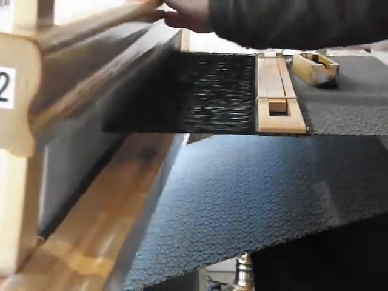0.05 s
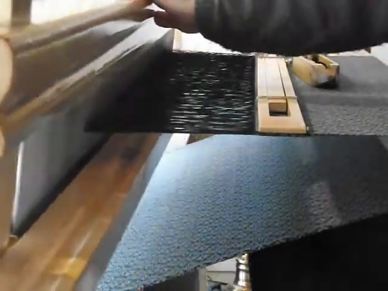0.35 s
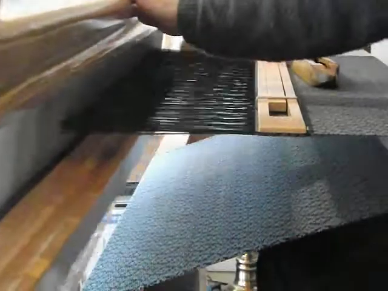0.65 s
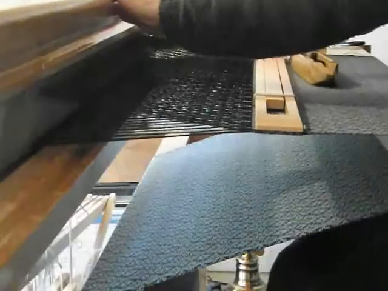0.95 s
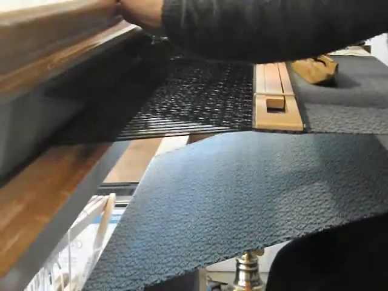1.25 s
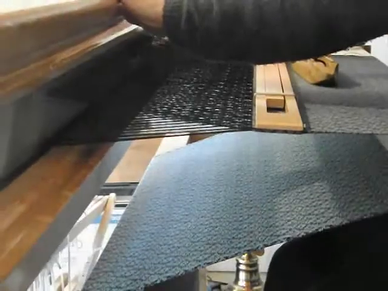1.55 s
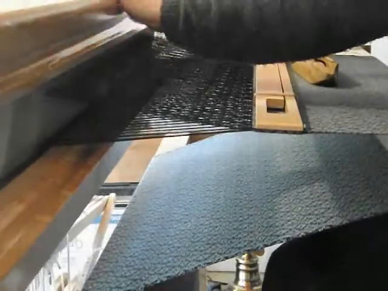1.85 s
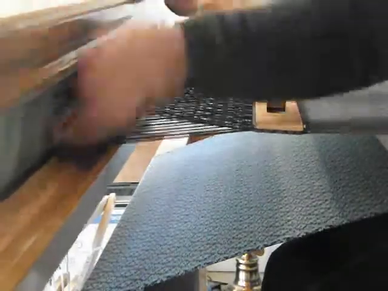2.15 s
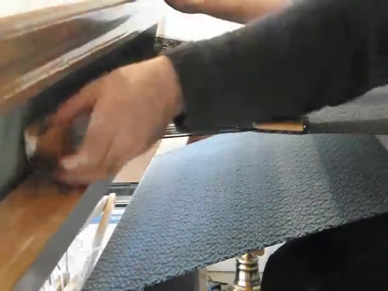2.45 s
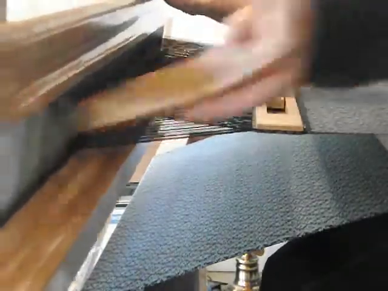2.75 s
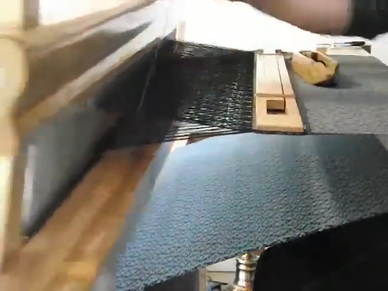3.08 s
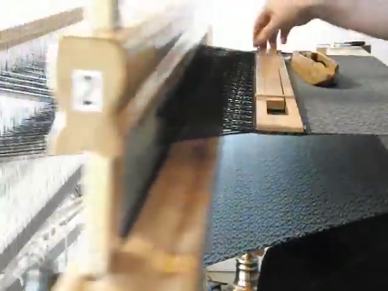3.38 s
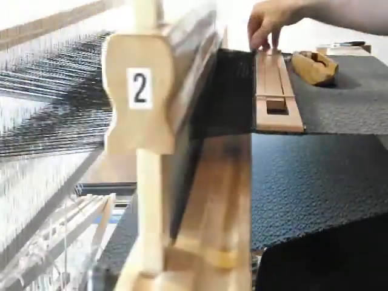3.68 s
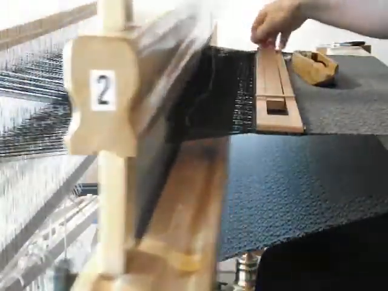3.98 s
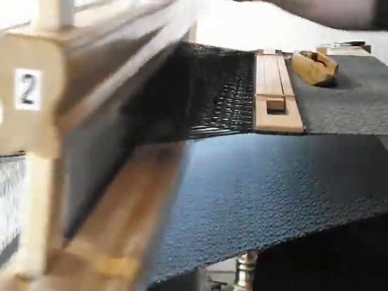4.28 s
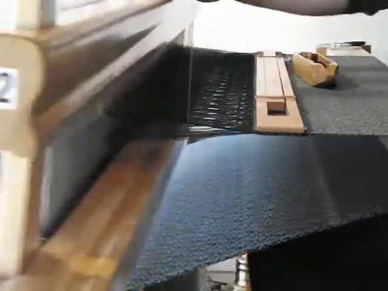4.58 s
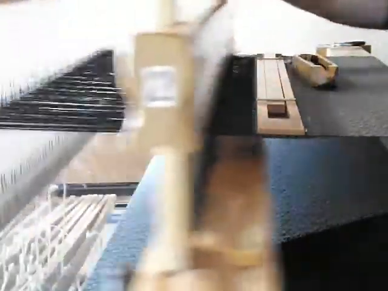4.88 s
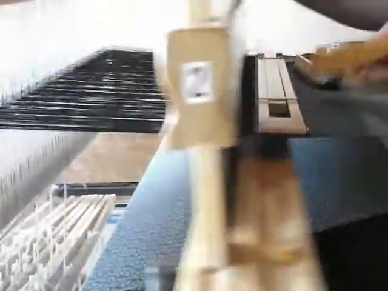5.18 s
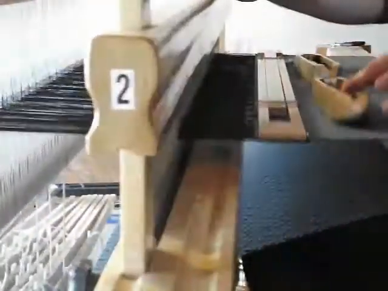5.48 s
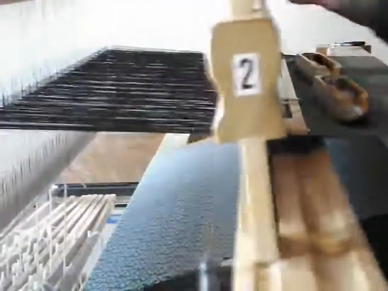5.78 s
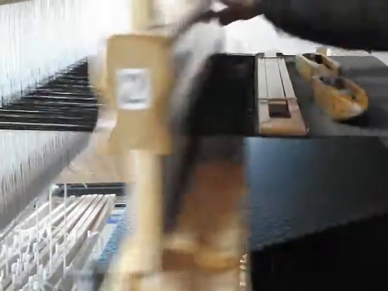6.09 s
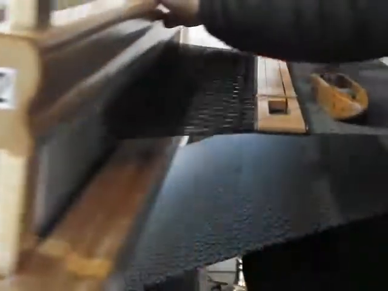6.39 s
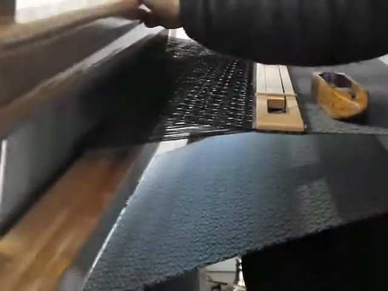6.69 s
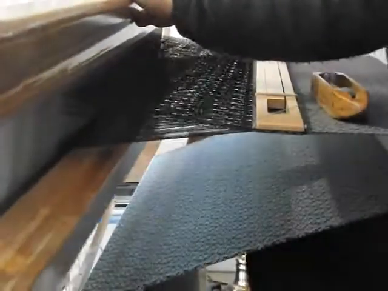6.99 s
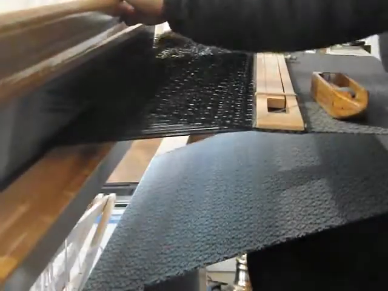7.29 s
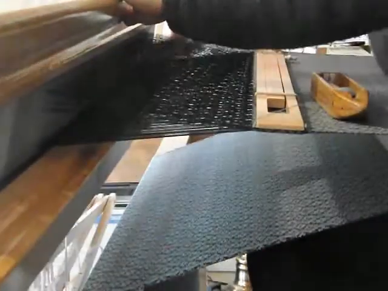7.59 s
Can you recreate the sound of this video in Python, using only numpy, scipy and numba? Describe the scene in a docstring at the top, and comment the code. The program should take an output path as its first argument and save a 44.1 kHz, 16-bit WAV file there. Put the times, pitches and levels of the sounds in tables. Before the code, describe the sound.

Metallic rattling, wooden knocks and brief pulley squeaks from a hand-worked loom, then two sharp beater blows, in a small humming room.

```python
"""A wooden floor loom, worked by hand in a small room. Treadles shift the shafts: hundreds of
wire heddles rattle and dry pulleys squeak. The shuttle slides softly, shuttle and frame knock,
metal parts clink, and the beater strikes the cloth twice; every blow rings the steel reed.
Underneath: electrical hum, room air and the low sway of a camera mount. A limiter ducks the
level after loud blows."""
import sys
import numpy as np
from scipy import signal
from scipy.fft import rfft, irfft
from scipy.io import wavfile
from scipy.ndimage import uniform_filter1d, minimum_filter1d
from numba import njit

SR = 44100
rng = np.random.default_rng(int(sys.argv[2]) if len(sys.argv) > 2 else 0)


def unload_wav(signal):
    """Save mono or channel-first audio to the path in sys.argv[1] as 16-bit WAV at rate SR, clipped to [-1, 1]."""
    wavfile.write(
        sys.argv[1],
        SR,
        np.round(np.clip(np.atleast_2d(signal).T, -1, 1) * 32767).astype(np.int16),
    )


N = 336924
TIME = np.arange(N) / SR

# wooden frame resonances: freq_hz, width_hz, gain_db
FRAME_MODES = [(256.4, 57, 1.5), (331, 22, 5.5), (525, 18, -7.5), (705, 290, -3), (814, 250, 1.5),
               (1073, 200, 3.5), (1308, 120, 5.5), (1481, 140, 10.5), (1720, 150, 9)]
# hard contact spectrum: freq_hz, gain_db
CONTACT_SPECTRUM = [(150, -13.5), (600, -30), (1500, -14.5), (2300, -2), (3100, 6.5), (3900, -3.5),
                    (4700, -9.5), (5400, -26.5), (6300, -35), (7200, -43)]


def heddles_and_slide(sag_db_per_s=44.5, settle_db_per_s=136.5, wood_ebb_ratio=0.77):
    """Heddles jostle on moving shafts and the shuttle slides; tiny contacts ring wires and frame."""
    # heddle flurries and the shuttle's soft slide (crest at 2.5 s):
    # crest_s, level_db, swell_s (per 20 dB), shaken_s, body_rel_db
    motions = [(0, -15.5, .05, 0, -6.5), (.42, -28.5, 0.2, 0.16, -3.5), (.72, -14.5, .17, 0.07, 0),
               (.865, 0, .13, 0.21, -9), (1.68, -29, 0.033, 0.016, -5.5), (1.999, -35, 0.11, 0.13, -2.5),
               (2.22, -39.5, .2, 0.12, -8.5), (2.5, -40, 0.31, 0.35, -6), (3.1, -52, 0.23, 0.00021, 8.5),
               (3.45, -47, .1, 0, -23), (4.6, -19, 0.13, 0.21, -6.5), (4.84, -16, 0.31, 0.041, -1.5),
               (5.129, -15.5, 0.36, 0.17, -5), (5.43, -26.5, 0.14, 0, 1.5), (5.84, -13, 0.095, 0.2, -7.5),
               (6.33, -16, 0.13, .08, -10), (6.521, -11, 0.13, 0.023, -0.5),
               (6.74, -19, 0.35, 0.00019, -5.5), (7.14, -38.5, .2, 0.011, -7)]
    # heddle and rail resonances: freq_hz, width_hz, gain_db
    wire_modes = [(1848, 6.8, -6), (1885, 14, 2.5), (2276, 13, 6.5), (2360, 36, 1.5), (2745, 10, 8.5),
                  (2840, 5.2, 1), (3180, 16, -4.5), (3440, 12, -5), (3420, 7, 10), (3700, 23, -1),
                  (4206, 11, 0.5), (5060, 31, -11.5), (4810, 10, -37), (6000, 44, -21), (5500, 60, -38)]
    t = np.linspace(0, TIME[-1], N // 100)
    wire_env, wood_env = np.zeros((2, len(t)))
    for crest_s, level_db, swell_s, shaken_s, body_db in motions:
        age = t - crest_s
        swell_db = 20 * np.minimum(age, 0) / max(swell_s, .01)
        sag_db = sag_db_per_s * np.clip(age, 0, shaken_s)
        ebb_db = sag_db + settle_db_per_s * np.maximum(age - shaken_s, 0)
        motion = undb(level_db + swell_db - ebb_db)
        wire_env = np.hypot(wire_env, motion)
        wood_env = np.hypot(wood_env, motion * undb(body_db + (1 - wood_ebb_ratio) * ebb_db))
    uneven = undb(2.1 * walk(35))
    wire_env = uneven * np.interp(TIME, t, wire_env)
    wood_env = uneven * np.interp(TIME, t, wood_env)
    shake = clicks(rate_hz=700, spread_db=-1)
    jangle = clicks(rate_hz=320, spread_db=1.5)
    ticks = undb(-4) * colour(shake * wire_env, CONTACT_SPECTRUM)
    wires = undb(-11) * resonate(jangle * wire_env, wire_modes)
    wood = undb(-3) * resonate(shake * wood_env, FRAME_MODES)
    return room(ticks + wires + wood, t60_s=0.4, wet_db=-6.5)


def blows(hardware_hz=3260):
    """Beats, knocks and clinks as rows: start_s, level_db, body_rel_db, t60_s, ring_hz, ring_rel_db."""
    # beater on cloth: start_s, level_db, t60_s
    beats = [(4.981, 5.5, 0.076), (5.759, 8, .095)]
    # shaft, treadle and shuttle knocks: start_s, level_db, t60_s, body_rel_db
    knocks = [(.289, -25, 0.078, -13.5), (0.483, -26.5, 0.11, -1.5), (0.54, -32, .14, 3),
              (0.823, -2.5, 0.18, 1.5), (1.222, -19, 0.076, -6.5), (1.586, -25.5, 0.097, -10.5),
              (1.929, -27.5, 0.15, -4), (2.286, -33, 0.11, 8.5), (2.431, -35.5, .15, -4.5),
              (2.977, -33.5, 0.15, -3.5), (3.323, -25.5, .14, -7.5), (4.356, -25.5, 0.098, -1),
              (4.529, -21.5, 0.13, -4.5), (4.869, -17.5, 0.052, -6), (5.232, -13, .1, -2),
              (5.732, -20, 0.071, -9), (6.033, -21.5, 0.092, -14.5), (6.139, -22.5, 0.13, -8),
              (6.473, -3.5, .07, -5.5), (7.08, -36, 0.085, 2), (7.429, -32, 0.042, -24)]
    # metal on metal: start_s, level_db, t60_s, ring_hz, ring_rel_db
    clinks = [(.336, -20, .15, 3318, 5), (0.661, -14.5, 0.092, 2726, 0.5), (.736, -3.5, 0.11, 2816, -7),
              (1.306, -22.5, 0.07, 3117, -6.5), (1.367, -23.5, 0.091, 3180, -4),
              (1.615, -23.5, 0.11, 2910, 5), (1.635, -21.5, 0.049, 2874, 6),
              (1.702, -23.5, 0.055, 3390, -3.5), (1.792, -28.5, 0.16, 2954, -5.5),
              (1.972, -24, 0.1, 3180, -5), (2.54, -33, 0.031, 3580, 2), (2.716, -33.5, 0.17, 2940, -7),
              (3.177, -41.5, 0.11, 3130, -3.5), (3.41, -34, 0.13, 3090, -8), (4.315, -38.5, 0.044, 3360, 4),
              (4.656, -11, 0.1, 3247, -8), (5.408, -20, 0.16, 3490, -4.5), (6.407, -21, 0.064, 2880, -2),
              (6.481, -19.5, .16, 3350, 1), (6.683, -20, 0.093, 2296, -6), (6.753, -19.5, 0.095, 3220, -2),
              (7.58, -36, 0.38, 3010, -3)]
    return ([(s, db, -10.5, t60, hardware_hz, -16) for s, db, t60 in beats]
            + [(s, db, body_db, t60, hardware_hz, -15.5) for s, db, t60, body_db in knocks]
            + [(s, db, -10, t60, hz, ring_db) for s, db, t60, hz, ring_db in clinks])


def impacts(chatter_ratio=0.18, ring_stretch=1.1, snap_db=4, snap_s=0.001, ring_rise_s=0.00077):
    """Each blow snaps, chatters, thuds in the frame and rings one metal part and the reed."""
    strikes, frame_drive, rings = np.zeros((3, N))
    t = TIME[:SR // 2]
    contacts = clicks(rate_hz=9000, spread_db=1)
    buzz_rad = .4 * walk(150)  # loose parts ring unevenly
    for start_s, level_db, body_db, t60_s, ring_hz, ring_db in blows():
        span = np.arange(len(t)) + int(start_s * SR)
        fade = np.exp(-np.log(1000) * np.maximum(t / t60_s - chatter_ratio, 0))
        snap = undb(level_db + snap_db * np.exp(-t / snap_s))
        blow = snap * fade * contacts.take(span, mode="wrap")
        add(strikes, start_s, blow)
        add(frame_drive, start_s, blow * undb(body_db))
        ring_env = undb(level_db + ring_db) * (1 - np.exp(-t / ring_rise_s)) * fade ** (1 / ring_stretch)
        ring_phase = 2 * np.pi * ring_hz * t + buzz_rad.take(span, mode="wrap")
        add(rings, start_s, ring_env * np.sin(ring_phase))
    clack = undb(-2.5) * colour(strikes, CONTACT_SPECTRUM)
    thud = undb(-3.5) * resonate(frame_drive, FRAME_MODES)
    ringing = room(undb(2.5) * rings, t60_s=.28, wet_db=-7)
    return room(clack + thud, t60_s=0.52, wet_db=-3.5) + ringing + reed(strikes)


def reed(strikes, coupling_db=-17, initial_db=14):
    """The steel reed rings with every blow."""
    # reed modes: freq_hz, width_hz, gain_db
    reed_modes = [(1066, 5, -13), (1486, 6, -11), (1771, 4.5, -1), (2190, 3, -4), (2767, 4.5, 2),
                  (3208, 4, 0), (3817, 4.5, -5), (5421, 3.5, -18), (5604, 3.5, -20)]
    drive = undb(coupling_db) * strikes
    add(drive, 0, undb([initial_db]))  # already ringing from an earlier beat
    return resonate(drive, reed_modes)


def pulleys(rough_db=3.5, alternation=0.25, brighten_db=3, flutter_db=3, scrape_db=-13):
    """Dry pulleys stick and slip: each squeak swells, brightens and fades over a scrape."""
    # squeaks: start_s, length_s, pitch_hz, glide_hz_per_s, level_db, tilt_db_per_partial, jitter_ratio
    squeaks = [(.645, 0.21, 944, -64, -14.5, -7.5, 0.013), (4.47, 0.14, 862, 108, -23.5, -4, .015),
               (4.565, 0.14, 932, -170, -21.5, 1.5, 0.019), (4.635, .105, 1108, -600, -21, -3, 0.031),
               (6.236, 0.18, 1036, 83, -28, -7, 0.033), (6.272, 0.21, 956, -4, -28, 6, 0.022)]
    # partials 1-4 before tilt: level_db
    partials_db = [-1, -1.5, -1.5, -20.5]
    out = np.zeros(N)
    wobble = walk(250)
    roughness = undb(rough_db * walk(120))
    flutters_db = [flutter_db * walk(35) for _ in partials_db]
    scrape = undb(scrape_db) * colour(rng.standard_normal(N), CONTACT_SPECTRUM)
    for start_s, length_s, pitch_hz, glide_hz_per_s, level_db, tilt_db, jitter in squeaks:
        span = slice(int(start_s * SR), int((start_s + length_s) * SR))
        age = TIME[span] - start_s
        slip_hz = (pitch_hz + glide_hz_per_s * age) * (1 + jitter * wobble[span])
        phase = 2 * np.pi * np.cumsum(slip_hz) / SR
        arch = np.abs(np.sin(np.pi * age / length_s)) ** 0.68
        grip = arch * roughness[span] * (1 + alternation * np.sin(phase / 2))  # alternate slips differ
        slope_db = tilt_db + brighten_db * (age / length_s - .5)
        tone = sum(undb(db + k * slope_db + flutters_db[k][span]) * np.sin((k + 1) * phase)
                   for k, db in enumerate(partials_db))
        out[span] += undb(level_db) * grip * (tone + undb(slope_db) * scrape[span])
    return room(undb(3) * out, t60_s=.25, wet_db=-8)


def mount_sway(sway_hz=14, decay_s=0.1):
    """The camera mount sways when the loom is pushed."""
    # pushes: start_s, level_db
    pushes = [(1.589, -23.5), (2.61, -15), (3.498, -18)]
    out, t = np.zeros(N), TIME[:SR]
    swing = 2 * t / decay_s * np.exp(-t / decay_s) * np.sin(2 * np.pi * sway_hz * t)
    for start_s, level_db in pushes:
        add(out, start_s, undb(level_db) * swing)
    return out


def hum(waver_db=2, waver_rad=0.22):
    """Low electrical hum; each line wavers in level and phase."""
    # hum lines: freq_hz, rms_db
    lines = [(59.3, -30.5), (101, -47.5), (161.5, -48), (215, -61.5)]
    out = np.zeros(N)
    for freq_hz, rms_db in lines:
        amplitude = np.sqrt(2) * undb(rms_db + waver_db * walk(13))
        out += amplitude * np.sin(2 * np.pi * freq_hz * TIME + waver_rad * walk(11))
    return out


def air(level_db=-34.5, waver_db=.5):
    """Room air and microphone hiss."""
    # noise spectrum: freq_hz, gain_db
    spectrum = [(25, 7), (60, 4), (100, -1), (160, -3), (300, -6.5), (450, -13), (900, -17), (2300, -19.5),
                (3100, -14.5), (3750, -24), (4300, -15.5), (4650, -30), (6800, -50)]
    return undb(level_db + waver_db * walk(6.6)) * colour(rng.standard_normal(N), spectrum)


def room(x, t60_s, wet_db, gap_s=0.0047):
    """Direct sound plus dense small-room reflections."""
    t = TIME[:SR]
    tail = rng.standard_normal(SR) * np.exp(-np.log(1000) * t / t60_s) * (t > gap_s)
    return x + undb(wet_db) * convolve_unit(x, tail)


def undb(db):
    """Decibels to gain."""
    return 10 ** (np.asarray(db) / 20)


def walk(rate_hz):
    """Random steps, smoothed twice."""
    hold = max(int(SR / rate_hz), 2)
    steps = np.repeat(rng.standard_normal(N // hold + 1), hold)
    return 0.89 * uniform_filter1d(uniform_filter1d(steps, hold), hold)[:N]


def clicks(rate_hz, spread_db):
    """Random tiny contacts of uneven size, rms 1."""
    sizes = undb(spread_db * np.minimum(rng.exponential(size=N), 4))
    train = (rng.random(N) < rate_hz / SR) * sizes * rng.choice([-1, 1], N)
    return train / np.sqrt(np.mean(train ** 2))


def add(track, start_s, sound):
    """Mix a sound in at start_s."""
    start = max(int(start_s * SR), 0)
    track[start:start + len(sound)] += sound[:N - start]


def convolve_unit(x, response):
    """Convolve with a response scaled to unit energy."""
    return signal.fftconvolve(x, response / np.linalg.norm(response))[:len(x)]


def colour(x, spectrum, size=4096):
    """Minimum-phase filter from freq_hz, gain_db points."""
    hz, db = np.transpose(spectrum)
    grid_hz = np.maximum(np.fft.rfftfreq(size, 1 / SR), 1)
    gain = undb(np.interp(np.log(grid_hz), np.log(hz), db))
    cepstrum = irfft(np.log(gain))
    cepstrum[1:size // 2] *= 2
    cepstrum[size // 2 + 1:] = 0
    return convolve_unit(x, irfft(np.exp(rfft(cepstrum))))


def resonate(x, modes, size=16384):
    """Bank of damped modes, band-passed to their range."""
    t = TIME[:size]
    response = sum(undb(db) * width_hz * np.exp(-np.pi * width_hz * t) * np.cos(2 * np.pi * hz * t)
                   for hz, width_hz, db in modes)
    edges_hz = modes[0][0] * .7, modes[-1][0] * 1.15
    band = signal.butter(3, edges_hz, "bandpass", fs=SR, output="sos")
    return convolve_unit(x, signal.sosfilt(band, response))


@njit
def limiter_cut(over_db, start_db, attack_db_per_s, hold_s, release_db_per_s):
    """Gain cut in dB: grows while peaks overshoot, holds, then releases."""
    out = np.empty(len(over_db))
    cut_db, wait_s = start_db, 0.
    for i in range(len(over_db)):
        if over_db[i] > cut_db:
            cut_db += attack_db_per_s / SR
            wait_s = hold_s
        elif wait_s > 0:
            wait_s -= 1 / SR
        else:
            cut_db = max(cut_db - release_db_per_s / SR, 0.)
        out[i] = cut_db
    return out


def scene():
    """The loom over hum and room air, mono."""
    return (heddles_and_slide() + impacts() + pulleys() + mount_sway() + hum() + air())[None]


def record(dry, mic_top_hz=6700, threshold_db=-5.5, ceiling=.7, top_hz=15800):
    """Narrow-band microphone into a limiter that ducks after loud blows."""
    x = signal.sosfilt(signal.ellip(8, .3, 80, mic_top_hz, fs=SR, output="sos"), dry[0])
    peak = np.maximum(-minimum_filter1d(-np.abs(x), size=128), 1e-9)
    over_db = 20 * np.log10(peak) - threshold_db
    cut_db = limiter_cut(over_db, start_db=13., attack_db_per_s=600., hold_s=0.07, release_db_per_s=46.1)
    x = x * undb(-cut_db)
    # crests that outrun the attack are squashed, splashing a little treble
    crest = -minimum_filter1d(-np.abs(x), size=5)
    x = x / np.maximum(crest / ceiling, 1)
    return signal.sosfilt(signal.ellip(8, .2, 70, top_hz, fs=SR, output="sos"), x)[None]


dry = scene()
out = record(dry)
unload_wav(out)
```